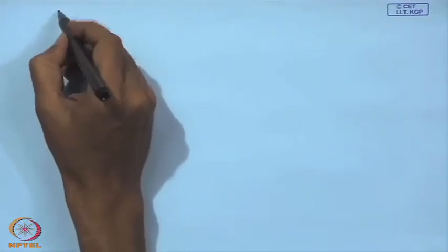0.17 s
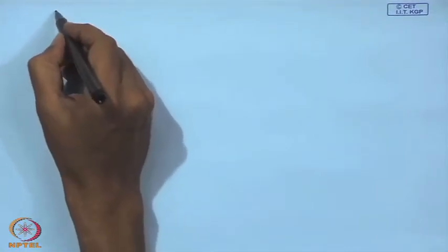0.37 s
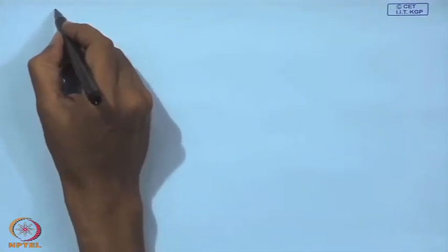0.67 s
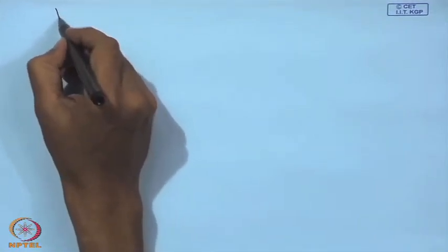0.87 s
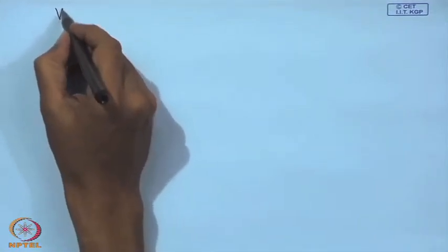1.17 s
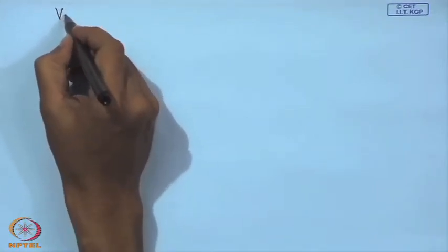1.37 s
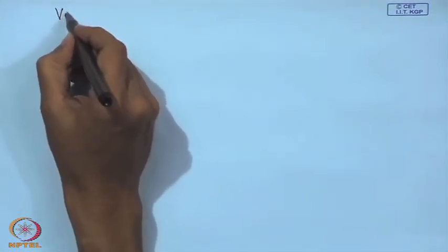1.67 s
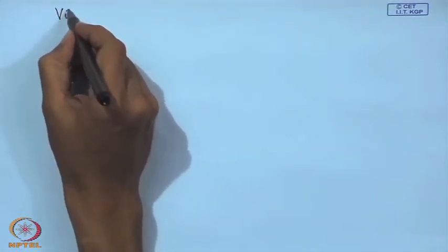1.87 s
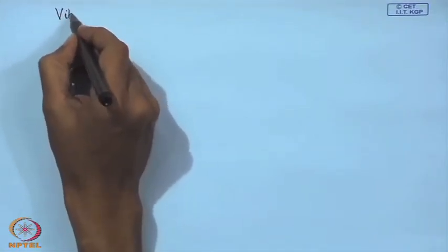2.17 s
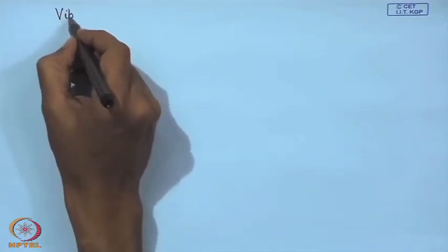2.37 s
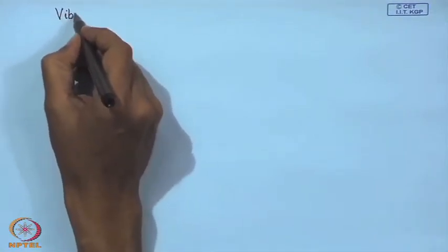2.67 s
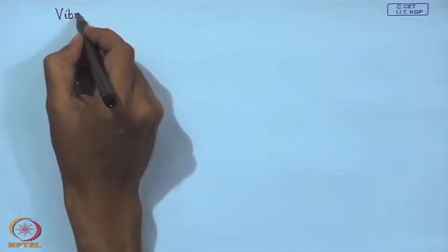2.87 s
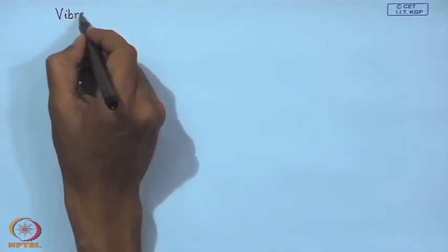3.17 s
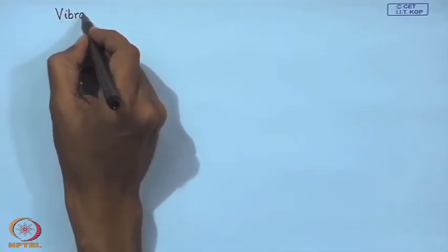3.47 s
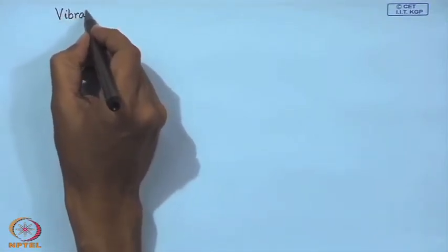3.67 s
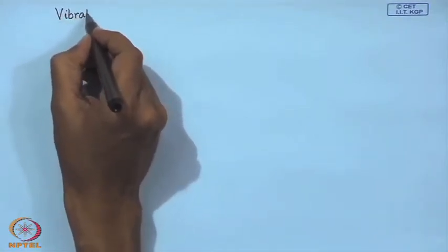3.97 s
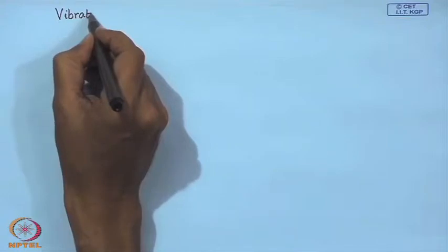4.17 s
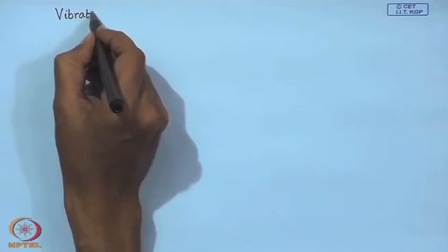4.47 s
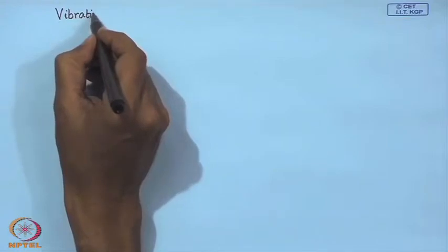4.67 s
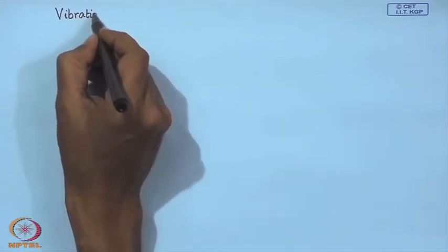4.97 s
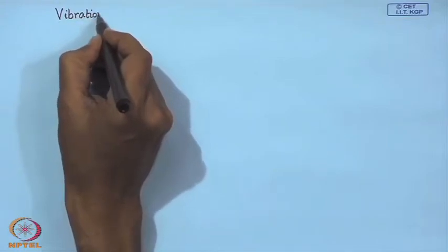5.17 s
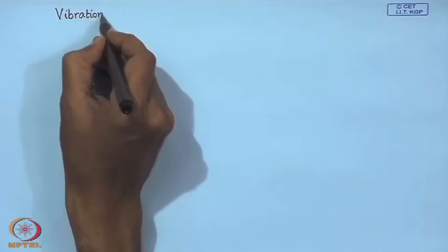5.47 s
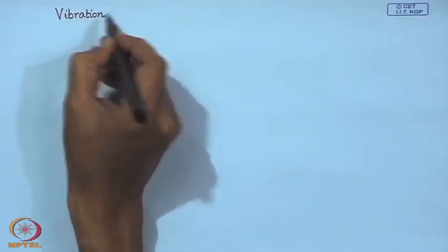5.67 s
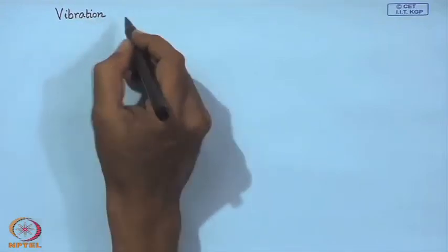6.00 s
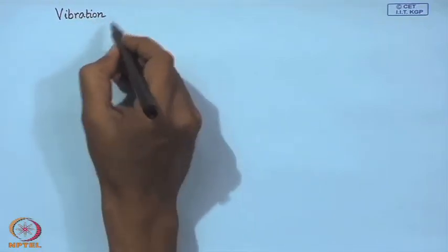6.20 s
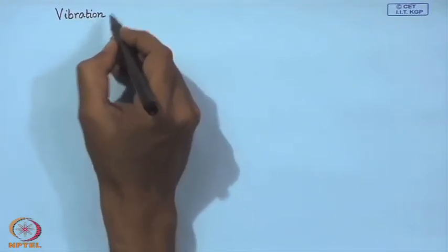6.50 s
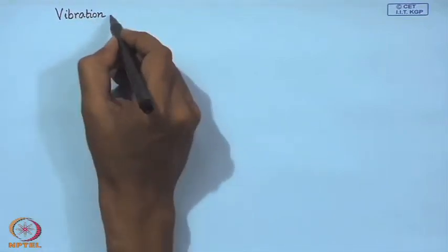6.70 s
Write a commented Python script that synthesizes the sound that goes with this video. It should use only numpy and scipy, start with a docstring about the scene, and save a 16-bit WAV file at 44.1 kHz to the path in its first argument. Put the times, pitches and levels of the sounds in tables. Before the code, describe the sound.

Close, dry pen strokes on paper, ending with a paper tick and a sliding hand, over steady ventilation rumble.

```python
"""A low ventilation rumble comes first, with mains hum and a faint electronic whine: a quiet room.
Then a fine pen writes one word on a sheet of paper on a desk, close and dry. Each stroke drags the
tip over the fibres and sets pen and sheet ringing, with a murmur from the desk, a few soft knocks
and thin squeaks. At the end the hand flicks the paper and slides away."""
import sys
import numpy as np
from scipy import signal
from scipy.fft import rfft, irfft, next_fast_len
from scipy.io import wavfile
from scipy.ndimage import uniform_filter1d

SR = 44100
rng = np.random.default_rng(int(sys.argv[2]) if len(sys.argv) > 2 else 0)


def pcm_store(signal):
    """Save signal as 16-bit PCM."""
    levels = np.round(np.clip(np.atleast_2d(signal), -1, 1) * 32767)
    wavfile.write(sys.argv[1], SR, levels.astype(np.int16).T)


N = 301644
TIME = np.arange(N) / SR

# colour of the room's air and hiss: f/Hz, relative level/dB
AIR_COLOUR = [(79, -37), (135, -1), (165, -0.5), (222, -8.5), (255, -7.5), (394, -14), (510, -14.5),
              (586, -14), (622, -18), (1080, -20.5), (1170, -23.5), (3230, -36.5), (3860, -37),
              (4350, -39.5), (15500, -43)]
# mains and fan tones: f/Hz, level/dB
HUM_TONES = [(100, -59), (247.6, -73), (461, -82.5), (585, -83.5), (674, -85.5), (867, -91), (965, -94)]
# bands of electronic whine: f/Hz, width/Hz, level/dB
WHINE_BANDS = [(3873, 12, -95.5), (3930, 19, -97), (9370, 20, -106), (10600, 66, -100), (11420, 110, -93.5),
               (11740, 140, -99), (14800, 6.9, -103)]
# fader ride on the whine: t/s, gain/dB
WHINE_RIDE = [(0, -1), (1.5, 2.5), (3, 2.5), (4.5, -2.5), (6.84, -1.5)]
# duct resonances: f/Hz, width/Hz, relative level/dB
DUCT_MODES = [(17.48, 2.25, -10), (27.185, 2.88, 1.5), (35.79, 7.26, -3)]
# swell of the duct rumble: t/s, level/dB
DUCT_SWELL = [(0.0, -33), (0.38, -27.5), (0.84, -33), (1.1, -25), (1.41, -34.5), (1.56, -28), (1.85, -25),
              (2.04, -33), (2.5, -23), (2.76, -29.5), (3.26, -24.5), (3.56, -34.5), (3.66, -29.5),
              (5.03, -31.5), (5.11, -23.5), (5.28, -34.5), (5.49, -30), (6.84, -32.5)]
# steadily driven room modes: f/Hz, width/Hz, level/dB
ROOM_RESONANCES = [(58.58, 5.8, -41.5), (71.1, 9, -56), (82.45, 11, -57.5), (96.7, 10, -61),
                   (117.84, 4.9, -65.5), (170.3, 16, -69), (194.4, 9.4, -71.5), (213.6, 8, -72),
                   (265.1, 24, -71.5), (307, 22, -75.5), (435.7, 130, -72.5)]
# faint thin squeaks: start t/s, length/s, start f/Hz, end f/Hz, level/dB
SQUEAK_GLIDES = [(1.506, 0.096, 1420, 1480, -70.5), (1.557, 0.13, 1295, 1266, -73.5),
                 (1.66, 0.06, 1462, 1404, -71.5)]
# hand and pen bumping the desk: centre t/s, f/Hz, width/Hz, spread in time/s, level/dB
DESK_KNOCKS = [(3.848, 1230, 380, 0.016, -69), (4.105, 766, 160, .012, -70),
               (5.73, 1420, 442, 0.0054, -59.5), (6.7, 1490, 1500, .012, -76)]
# sharp ticks of the sheet: t/s, peak level/dB
PAPER_TICKS = [(5.7279, -37), (5.7339, -39)]
# colour of skin on paper: f/Hz, relative level/dB
SKIN_COLOUR = [(900, -1), (1500, -4), (2400, -13), (4000, -5.5), (5500, -7), (7500, -4), (9200, -6.5),
               (11000, -2.5), (13500, -9), (15500, -5.5)]
# side of the hand sliding on or touching the sheet: firmest t/s, swell/s, fade/s, level/dB
HAND_SLIDES = [(5.736, 0.061, 0.004, -57.0), (5.764, 0.154, 0.218, -72), (5.997, 0.007, 0.004, -68),
               (6.22, 0.243, 0.203, -75), (6.221, 0.006, 0.003, -64), (6.48, 0.016, 0.03, -77),
               (6.54, 0.027, 0.015, -79.0), (6.694, 0.012, 0.008, -74.0)]
# resonances of pen barrel and sheet: f/Hz, width/Hz, relative level/dB
BODY_MODES = [(1920, 710, -11), (3060, 980, -4.5), (4000, 460, -11.5), (5180, 1200, -1), (5950, 670, -5.5),
              (6940, 260, -7.5), (7700, 450, -8.5), (8400, 770, -5), (12940, 1000, 0.5), (14100, 590, -2.5)]
# resonances of the nib: f/Hz, width/Hz, relative level/dB
NIB_RESONANCES = [(9700, 930, 6.5), (11170, 880, 6), (11630, 880, 3.5)]
# pen strokes: fastest t/s, speeding up/s, slowing down/s, scratch level/dB, nib gain from pressure/dB
PEN_STROKES = [(0.839, 0.033, 0.11, -68, -12), (1.055, 0.05, 0.073, -59.5, 0),
               (1.111, 0.015, 0.012, -65.5, -2), (1.138, 0.041, 0.007, -73, -4.0),
               (1.197, 0.021, 0.014, -73.5, -5), (1.432, 0.032, 0.041, -71.5, -4.0),
               (1.536, 0.029, 0.059, -70.5, -8), (1.629, 0.041, 0.016, -72, -1.0),
               (1.989, 0.034, 0.068, -63.0, -5.5), (2.181, 0.053, 0.079, -68.5, -4),
               (2.359, 0.115, 0.029, -65.5, -3.5), (2.699, 0.036, 0.043, -71, -5.0),
               (2.822, 0.052, 0.073, -65.5, -3), (3.213, 0.046, 0.098, -64.5, -3.5),
               (3.339, 0.066, 0.033, -71, -4), (3.365, 0.02, 0.059, -67, -1.0),
               (3.481, 0.013, 0.044, -76.5, -3), (3.539, 0.026, 0.017, -73.5, -1.0),
               (3.798, 0.039, 0.085, -68.0, -7.0), (3.932, 0.067, 0.024, -70, -5.0),
               (4.107, 0.017, 0.04, -65.0, -2.0), (4.296, 0.048, 0.045, -74.5, -8.0),
               (4.373, 0.02, 0.017, -67.5, 0), (4.576, 0.01, 0.011, -69.0, -1.5),
               (4.785, 0.039, 0.075, -73, -4.0), (4.897, 0.08, 0.056, -66, -5.5),
               (4.966, 0.044, 0.008, -71, -1), (5.196, 0.061, 0.031, -74.5, -5),
               (5.372, 0.102, 0.046, -69.0, -2), (5.468, 0.072, 0.045, -77.0, -7),
               (5.546, 0.024, 0.049, -62.0, -1.5)]


def from_db(db):
    """Decibels to gain."""
    return 10 ** (np.asarray(db) / 20)


def unit_power(x):
    """Scale to an RMS of 1."""
    return x / np.sqrt(np.mean(x ** 2) + 1e-20)


def levelled(x):
    """Hold the power near 1 over every quarter of a second."""
    return x / np.sqrt(uniform_filter1d(x ** 2, size=SR // 4))


def drift(rate):
    """Random modulation with spread 1 that changes course about rate times a second."""
    knots = rng.standard_normal(8192)
    return np.interp(TIME * rate, np.arange(len(knots)), knots) / np.sqrt(2 / 3)


def coloured_noise(colour):
    """Noise through an EQ curve of f/Hz, level/dB points; unit power."""
    hz, db = np.transpose(colour)
    size = next_fast_len(N)
    bin_hz = np.maximum(np.arange(size // 2 + 1) * SR / size, 1)
    eq = from_db(np.interp(np.log(bin_hz), np.log(hz), db))
    return unit_power(irfft(rfft(rng.standard_normal(N), size) * eq, size)[:N])


def resonate(x, hz, width_hz):
    """Two identical two-pole resonators in series, with gain 1 at the peak."""
    radius = np.exp(-np.pi * width_hz / SR)
    b = np.array([1, 0, -1]) * (1 - radius ** 2) / 2
    a = [1, -2 * radius * np.cos(2 * np.pi * hz / SR), radius ** 2]
    return signal.lfilter(b, a, signal.lfilter(b, a, x + 1e-18))


def narrow_noise(hz, width_hz):
    """Resonant noise, already ringing at the start; unit power."""
    return unit_power(resonate(rng.standard_normal(N + SR), hz, width_hz)[SR:])


def room_air(level_db=-61.0):
    """The room's air lays a dark, steady bed with a trace of hiss."""
    return from_db(level_db) * coloured_noise(AIR_COLOUR)


def hum(waver_db=3.0, waver_rad=0.77):
    """Mains and fan tones, each wavering in level and phase."""
    out = np.zeros(N)
    for hz, db in HUM_TONES:
        gain = from_db(db + waver_db * drift(5))
        phase = 2 * np.pi * (hz * TIME + rng.random()) + waver_rad * drift(6)
        out += gain * np.sqrt(2) * np.sin(phase)
    return out


def whine():
    """Electronics sing faintly in thin, high bands."""
    bands = sum(from_db(db) * narrow_noise(hz, width) for hz, width, db in WHINE_BANDS)
    return bands * from_db(np.interp(TIME, *np.transpose(WHINE_RIDE)))


def ventilation():
    """Moving air drives the ducts in swells and the modes of the room evenly."""
    ducts = levelled(sum(from_db(db) * narrow_noise(hz, width) for hz, width, db in DUCT_MODES))
    room = sum(from_db(db) * levelled(narrow_noise(hz, width)) for hz, width, db in ROOM_RESONANCES)
    return ducts * from_db(np.interp(TIME, *np.transpose(DUCT_SWELL))) + room


def squeaks(pitch_wobble=0.015, grip_db=3.5):
    """Short, slightly gliding tones, roughened by an unsteady grip."""
    out = np.zeros(N)
    wobble = 1 + pitch_wobble * drift(300)
    for start, length, start_hz, end_hz, db in SQUEAK_GLIDES:
        progress = np.clip((TIME - start) / length, 0, 1)
        hz = (start_hz + (end_hz - start_hz) * progress) * wobble
        envelope = from_db(db) * np.sin(np.pi * progress)
        out += envelope * np.sqrt(2) * np.sin(2 * np.pi * np.cumsum(hz) / SR)
    return out * from_db(grip_db * drift(150))


def knocks():
    """Soft bumps on the desk swell and die, each in one broad resonance."""
    return sum(from_db(db) * np.exp(-.5 * ((TIME - centre) / spread) ** 2) * narrow_noise(hz, width)
               for centre, hz, width, spread, db in DESK_KNOCKS)


def paper_ticks(decay_s=0.0003, band_hz=(5000, 15000)):
    """The sheet snaps: a bright crack, over within a millisecond."""
    out, age = np.zeros(N), np.arange(256) / SR
    bandpass = signal.butter(2, band_hz, "band", fs=SR, output="sos")
    for start, db in PAPER_TICKS:
        burst = rng.standard_normal(len(age)) * np.exp(-age / decay_s)
        crack = signal.sosfilt(bandpass, burst)
        at = round(start * SR)
        out[at:at + len(age)] += from_db(db) * crack / np.abs(crack).max()
    return out


def slide_envelope(ramp_db=19.5):
    """The hand settles and lifts off, gaining ramp_db over its swell and losing it over its fade."""
    power = np.zeros(N)
    for firmest, swell_s, fade_s, db in HAND_SLIDES:
        from_peak = np.maximum((firmest - TIME) / swell_s, (TIME - firmest) / fade_s)
        touching = from_peak < 3
        power[touching] += from_db(db - ramp_db * from_peak[touching]) ** 2
    return np.sqrt(power)


def hand(trim_db=1.5, grip_db=1.5):
    """Skin brushes the sheet with a wide hiss that flutters with its grip."""
    return from_db(trim_db + grip_db * drift(200)) * slide_envelope() * coloured_noise(SKIN_COLOUR)


def stroke_envelope(roundness=1.75, speed_exponent=1.94):
    """In each stroke the tip speeds up from rest and stops again; the scratch follows its speed."""
    power = np.zeros(N)
    for fastest, rise_s, fall_s, db, _ in PEN_STROKES:
        from_peak = np.maximum((fastest - TIME) / rise_s, (TIME - fastest) / fall_s)
        moving = from_peak < 1
        speed = 1 - from_peak[moving] ** roundness  # 1 is pointed, 2 is a parabola
        power[moving] += (from_db(db) * speed ** speed_exponent) ** 2
    return np.sqrt(power)


def desk(level_db=-72.0, firm_stroke_db=-60, compression=0.27, hz=1270, width_hz=330):
    """The desk murmurs under the moving tip: level_db in a firm stroke, a little less in light ones."""
    push = (stroke_envelope() / from_db(firm_stroke_db)) ** compression
    return from_db(level_db) * uniform_filter1d(push, size=900) * narrow_noise(hz, width_hz)


def fibre_friction(snaps_per_s=8800, spread_db=3.5, rub_gain=0.92):
    """Fibres snap free at random, in many sizes, over a smooth rubbing noise."""
    sizes = from_db(spread_db * np.minimum(rng.exponential(1, N), 4))
    snaps = (rng.random(N) < snaps_per_s / SR) * rng.choice([-1, 1], N) * sizes
    return unit_power(unit_power(snaps) + rub_gain * rng.standard_normal(N))


def ringing(drag, modes, wander_db=0.6):
    """Friction rings a set of modes; every snap reaches each mode with a strength of its own."""
    out = np.zeros(N)
    for hz, width, db in modes:
        ring = unit_power(resonate(drag * rng.standard_normal(N), hz, width))
        out += ring * from_db(db + wander_db * drift(12))
    return out


def pen(trim_db=0.36, grip_db=0.86, fibres_db=-12):
    """Friction at the tip rings barrel, sheet and nib; a firm stroke favours the bright nib."""
    drag = fibre_friction()
    body, nib = ringing(drag, BODY_MODES), ringing(drag, NIB_RESONANCES)
    stroke_times, *_, pressure_db = np.transpose(PEN_STROKES)
    nib_gain = from_db(np.interp(TIME, stroke_times, pressure_db))
    # pressure changes the colour, not the power
    rings = (body + nib_gain * nib) / np.sqrt(body.var() + nib_gain ** 2 * nib.var())
    grip = from_db(grip_db * drift(220))
    return from_db(trim_db) * stroke_envelope() * grip * (rings + from_db(fibres_db) * drag)


def scene():
    """The writing, close and dry, over the room tone; mono."""
    writing = pen() + desk() + hand() + paper_ticks() + knocks() + squeaks()
    room_tone = ventilation() + room_air() + hum() + whine()
    return (writing + room_tone)[None]


def record(dry, cutoff_hz=15760):
    """A steep high cut on the mix; a mirrored lead-in keeps the start free of clicks."""
    high_cut = signal.ellip(12, .1, 80, cutoff_hz, fs=SR, output="sos")
    padded = np.pad(dry, ((0, 0), (SR, 0)), mode="reflect", reflect_type="odd")
    return signal.sosfilt(high_cut, padded)[:, SR:]


dry = scene()
out = record(dry)
pcm_store(out)
```